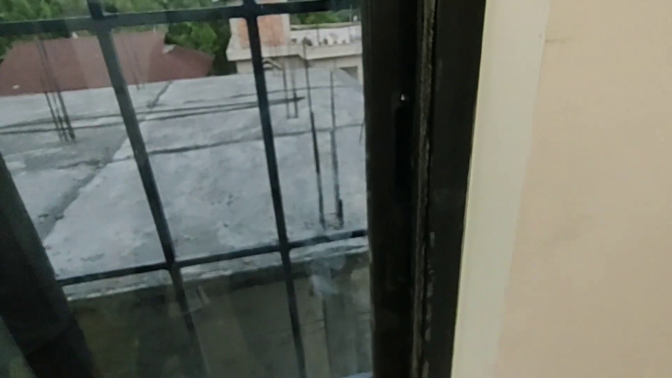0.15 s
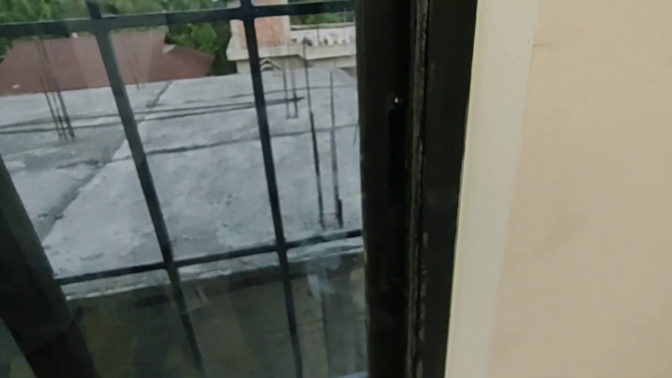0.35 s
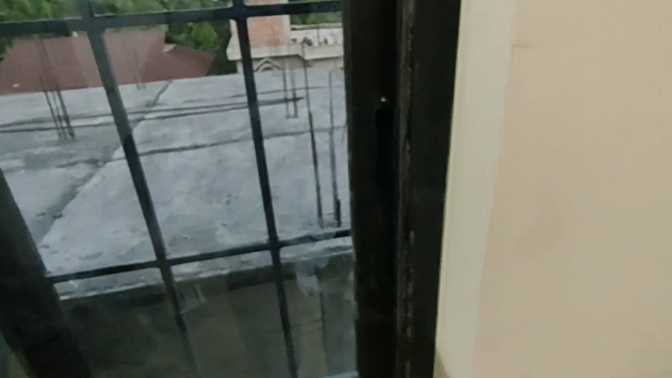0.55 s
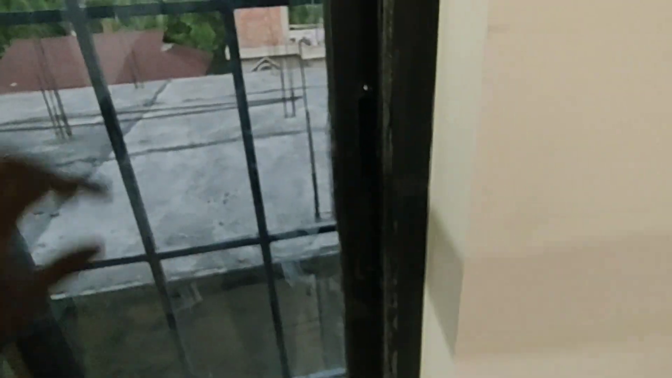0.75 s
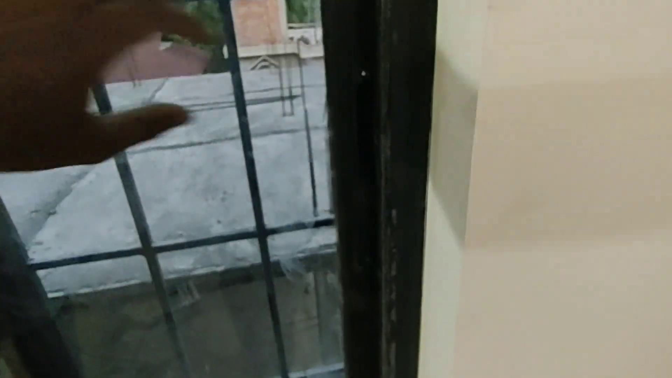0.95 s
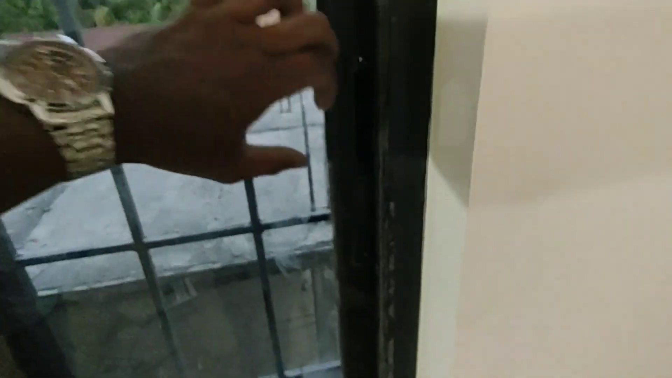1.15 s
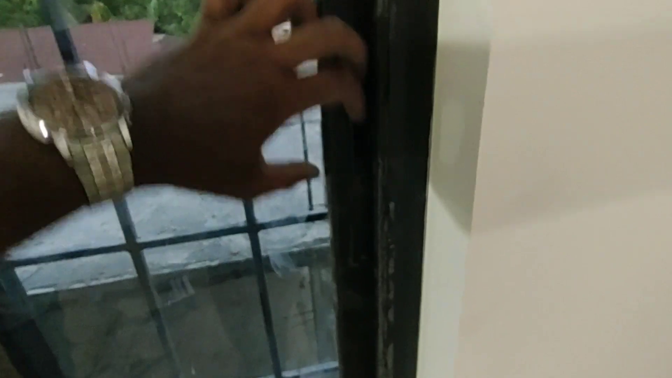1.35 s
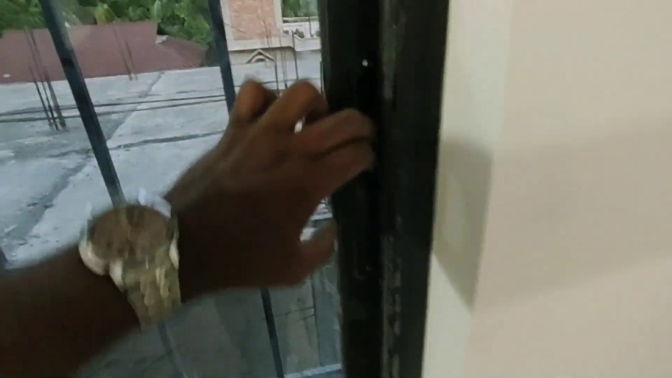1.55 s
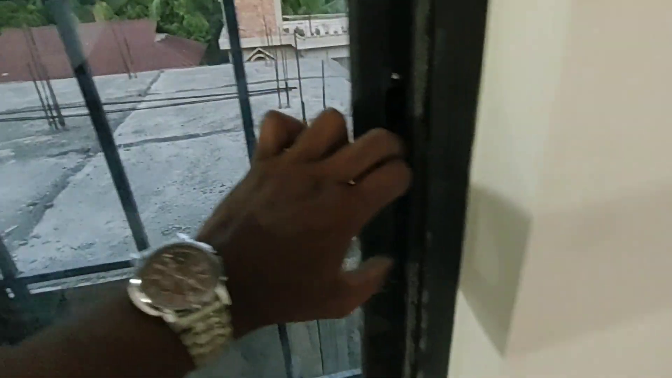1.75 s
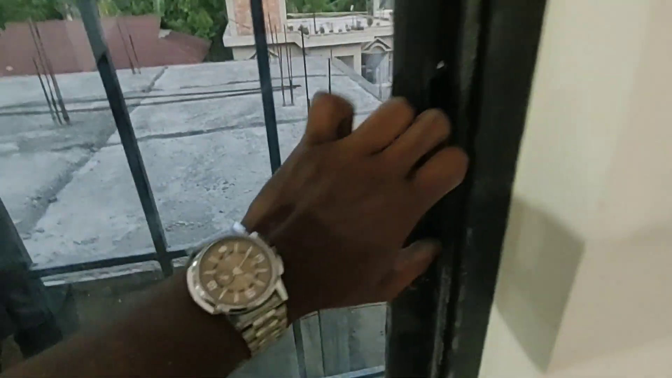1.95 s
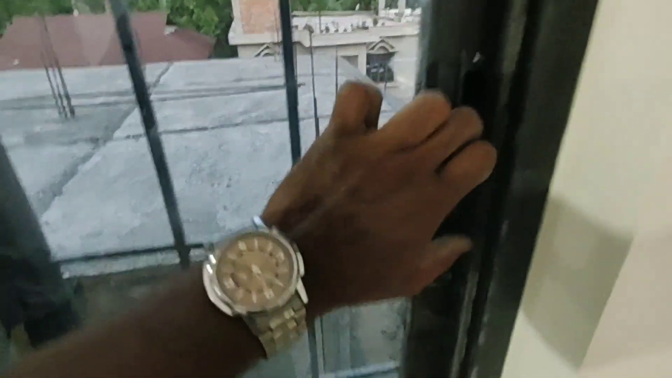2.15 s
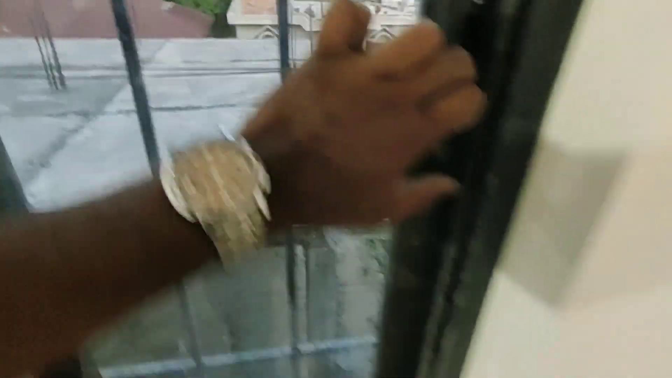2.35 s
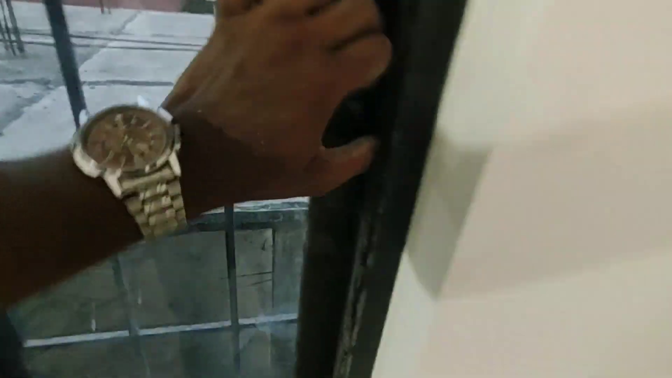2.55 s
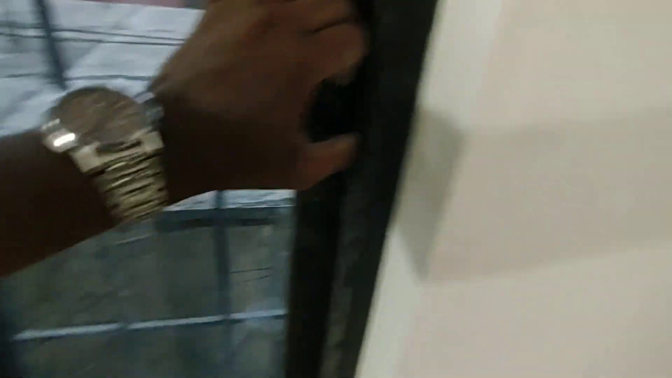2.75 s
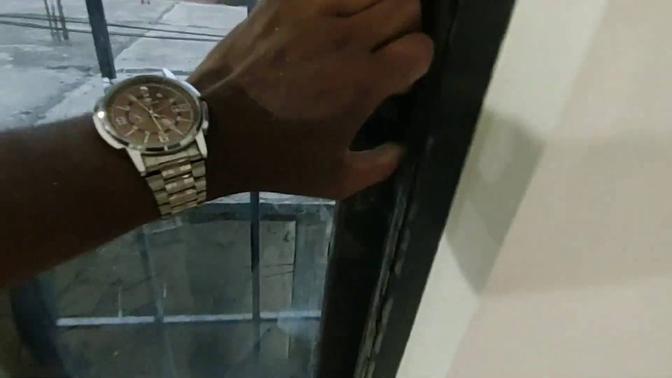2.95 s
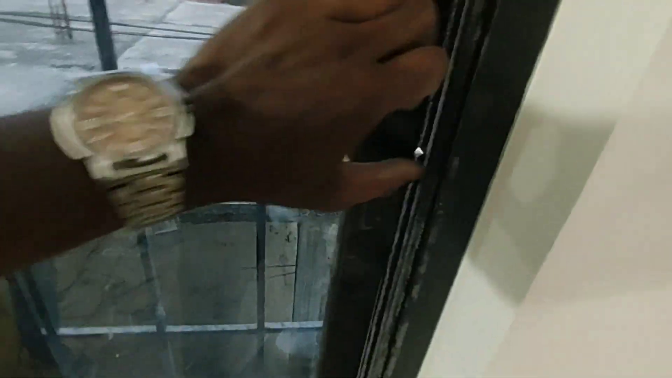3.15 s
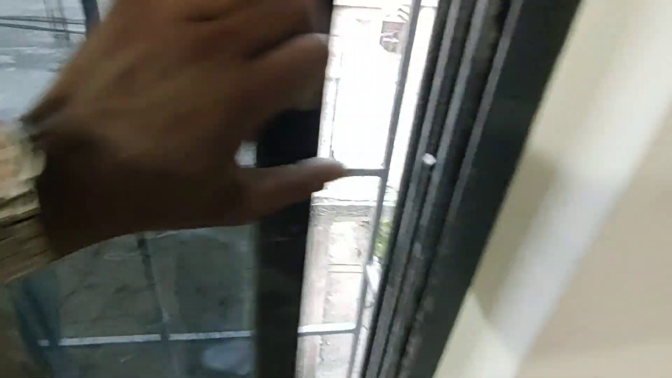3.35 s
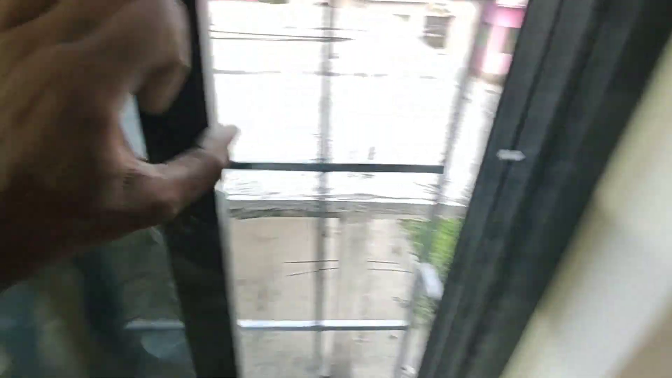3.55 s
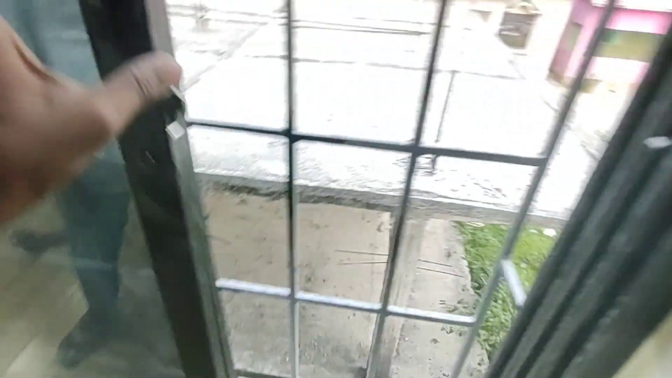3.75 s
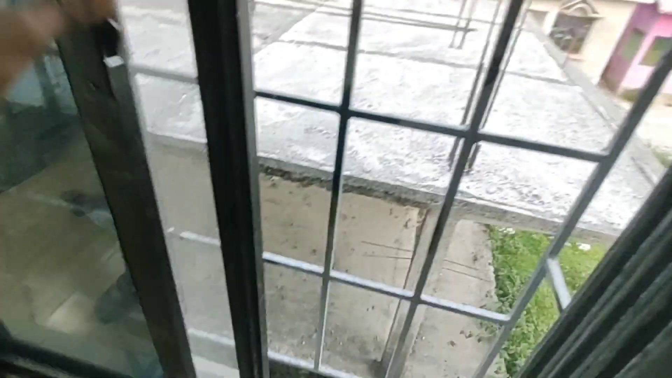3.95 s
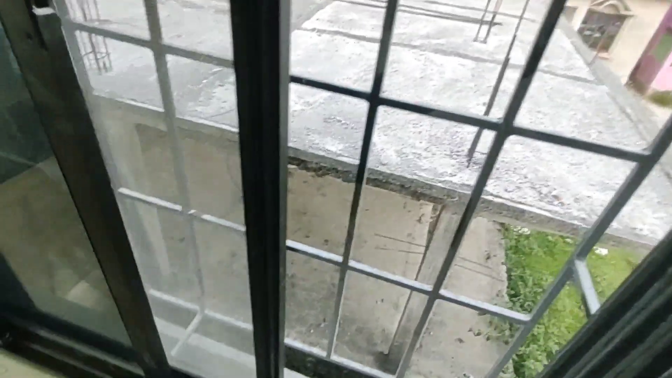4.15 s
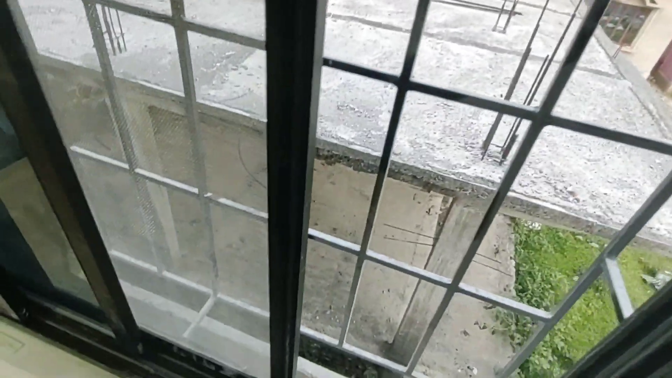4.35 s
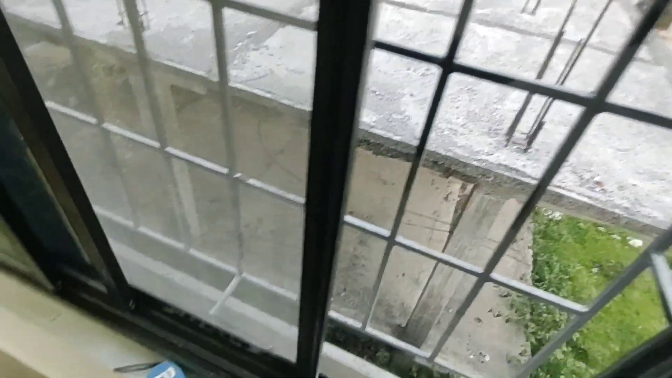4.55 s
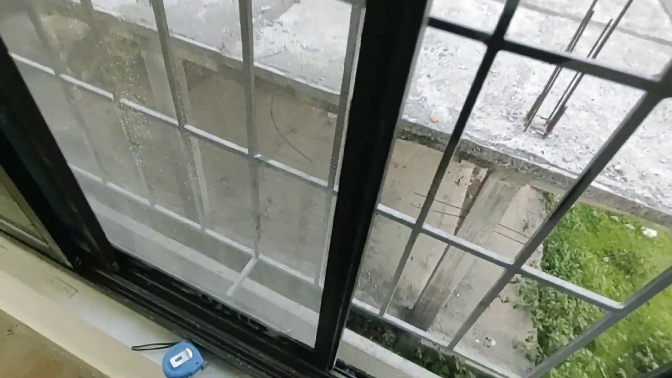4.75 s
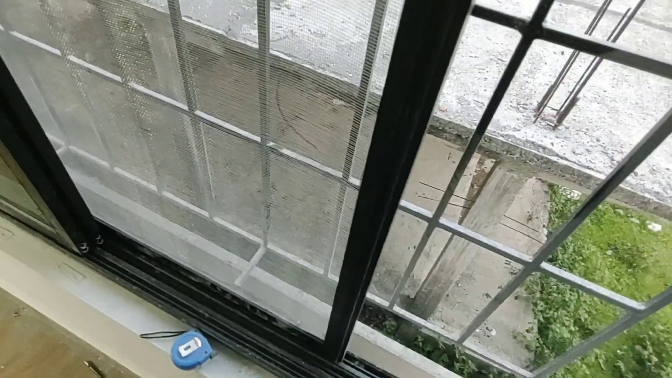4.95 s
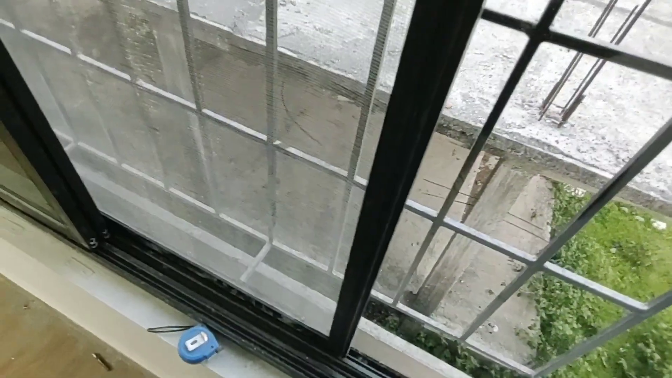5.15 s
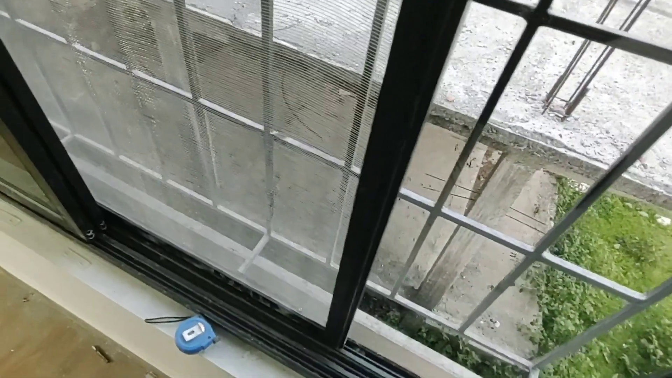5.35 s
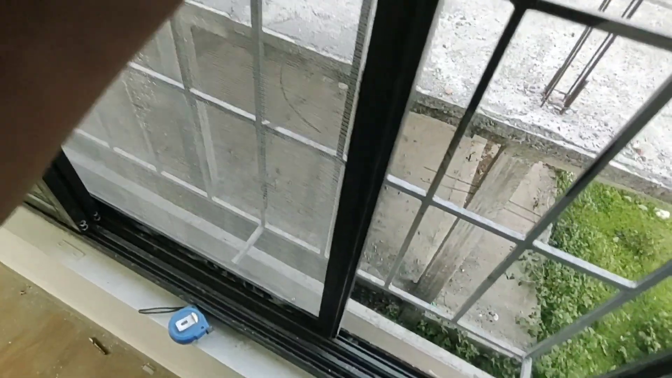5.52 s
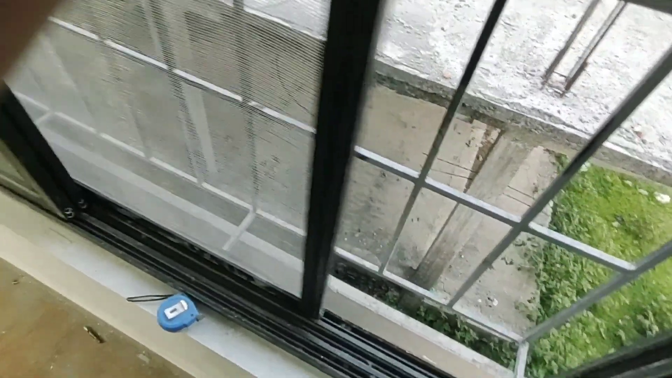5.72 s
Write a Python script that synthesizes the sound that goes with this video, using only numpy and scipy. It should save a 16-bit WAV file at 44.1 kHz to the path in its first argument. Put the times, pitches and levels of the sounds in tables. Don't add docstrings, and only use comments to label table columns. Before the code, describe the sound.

Sliding aluminium window worked by hand, heard up close with short hard-wall reverberation. Light fumbling and a dry catch click lead to a thump, short scrape and crisp clack. Gritty sliding grows to a cluster of metallic knocks; another sash glides with a low rumble and hissing seal, then slams with a hollow glassy thud. A tiny high roller squeak comes near the end.

```python
import sys
import numpy as np
from scipy import signal
from scipy.fft import rfft, irfft
from scipy.io import wavfile
from scipy.ndimage import uniform_filter1d

SR = 44100
rng = np.random.default_rng(int(sys.argv[2]) if len(sys.argv) > 2 else 0)


def makeup_ratio(level_db):
    decades = np.asarray(level_db, float) / 20
    return 10 ** decades


def persist_wave(psi):
    counts = np.round(np.clip(psi, -1, 1) * 32767).astype(np.int16)
    wavfile.write(sys.argv[1], SR, np.atleast_2d(counts).T)


N = 259616
TIME = np.arange(N) / SR

# frequency in Hz, level in dB, decay time t60 in s.
PANE_MODES = [(75, -6, 0.3), (101, -1, 0.3), (122, 1, 0.4), (133, -1, 0.3), (160, 1, 0.25), (188, -3, .2),
              (215, -1, 0.3), (236, -1, 0.4)]
# start in s, peak in dB, hollow part in dB, brightness in dB,
# rattle left in the frame in dB.
CLICKS = [(1.5857, -52.5, -6, -6.5, -1), (1.672, -30, 4, -6, -3.5), (2.079, -61, -4, -4.5, -8),
          (2.164, -54.5, 12.5, 1.5, 10), (2.205, -57, 12, -2, 0), (2.331, -42, 7, -11, -10),
          (2.339, -20.5, 7, -14.5, -1), (2.8104, -8.5, -4.5, -2.5, -1.5), (3.703, -23.5, -18, 7.5, -2),
          (3.9076, -23, 3, -1.5, 10), (3.9217, -10.5, -11, -6, -19), (3.93, -14, 3, 1, -18),
          (3.9418, -23, 1, 6.5, -21), (3.997, -32, -3, -3, -14), (4.012, -25, 4, 3, -14),
          (4.022, -32, 3, 1, -14), (4.7946, -22, 2, -6.5, -14), (4.9431, -26.5, -38, -17, -15),
          (5.0634, -10, 1, -8, -7), (5.074, -29.5, -16, 6.5, -12), (5.0826, -26.5, -4, 1.5, -5),
          (5.104, -19, 0, 9, -17), (5.1419, -20.5, -13, -4, 0), (5.1877, -25, -2, 5, -6),
          (5.2037, -30.5, -8, 6, -10)]
# start in s, peak in dB, track share in dB, chatter in ms,
# deep part of the track in dB.
THUDS = [(0.829, -45, -19, 7.7, 4), (1.272, -28.5, -23, 8.8, -1), (1.329, -40, -22, 6, 6),
         (1.41, -50, -20, 3.6, 5), (1.579, -32.5, -22, 4.5, 2), (1.623, -35, -25, 9.5, -8),
         (1.668, -30.5, -2, 2.4, -1), (2.329, -21, -30, 4.6, -2), (2.337, -17, -9.5, 2.3, -4),
         (2.807, -24.5, 2.5, 5, -5), (3.906, -11.5, -7, 8, 2), (3.921, -10.5, -4, 5.1, 5),
         (3.942, -18, -9.5, 6.4, -3), (3.992, -13, -9, 4.7, 4), (4.04, -12.5, -10, 2.6, -1.5),
         (5.061, -2.5, -5, 8.3, -4), (5.086, -20, -6, 2.6, -9), (5.104, -18.5, -3.5, 12.5, 4),
         (5.139, -4, -18.5, 10, -1), (5.343, -12, -32.5, 6.8, 13), (5.372, -25.5, -19, 3.4, 8.5),
         (5.446, -23.5, -22, 5.4, 4)]


def unit(x):
    return x / np.sqrt(np.mean(x ** 2))


def curve(table, order):
    rows = np.array(table, float)
    return np.interp(TIME, rows[:, 0], rows[:, order])


def span(from_s, to_s):
    return uniform_filter1d(1. * (TIME > from_s) * (TIME < to_s), size=800)


def arch(s, long_s, skew):
    return np.sin(np.pi * np.clip((TIME - s) / long_s, 0, 1) ** skew)


def walk(rate):
    hold = int(SR / rate)
    steps = np.repeat(rng.standard_normal(N // hold + 1), hold)
    return unit(uniform_filter1d(steps, hold)[:N])


def after(hits, under_db, loss_db_s):
    s, db = np.transpose(hits)
    power = np.zeros(N)
    power[(s * SR).astype(int)] = makeup_ratio(db + under_db) ** 2
    return np.sqrt(signal.lfilter([1], [1, -makeup_ratio(-2 * loss_db_s / SR)], power))


def band(x, low_hz, high_hz):
    return signal.sosfilt(signal.butter(2, [low_hz, high_hz], "band", fs=SR, output="sos"), x)


def response(spectrum):
    hz, db = np.transpose(spectrum)
    grid = np.arange(4097) * SR / 8192 + 1
    log_gain = np.interp(np.log(grid), np.log(hz), db) * np.log(10) / 20
    cep = irfft(log_gain)
    cep[1:4096] *= 2
    cep[4097:] = 0
    h = irfft(np.exp(rfft(cep)))[:4096]
    return h / np.sqrt(np.sum(h ** 2))


def ringing(spectrum, modes, most_t60, modes_db):
    t = TIME[:SR // 2]
    ring = sum(makeup_ratio(db) * np.sin(2 * np.pi * hz * t) * makeup_ratio(-60 * t / min(t60, most_t60))
               for hz, db, t60 in modes)
    h = makeup_ratio(modes_db) * ring / np.sqrt(np.sum(ring ** 2))
    h[:4096] += response(spectrum)
    return h / np.sqrt(np.sum(h ** 2))


def through(x, h):
    return signal.oaconvolve(x, h)[:N]


def place(x, pan_db):
    return x * makeup_ratio(np.array([pan_db, -pan_db]).reshape(2, -1) / 2)


def spread(noise, same_below_hz):
    mid, side = noise
    side = signal.sosfilt(signal.butter(1, same_below_hz, "high", fs=SR, output="sos"), side)
    return np.array([mid + side, mid - side])


def sing(s, long_s, hz, db, wobble):
    tone = np.sin(2 * np.pi * np.cumsum(hz * (1 + wobble * walk(220))) / SR)
    return place(np.sqrt(2) * tone * span(s, s + long_s) * makeup_ratio(db), 0.)


def add(force, s, burst):
    i = int((s - .0015) * SR)
    force[..., i:i + burst.shape[-1]] += burst


def grit(per_s, spread_db, flicker_db):
    hits = rng.random(N) < per_s / SR
    grains = hits * makeup_ratio(spread_db * rng.exponential(size=N)) * rng.standard_normal(N)
    return unit(grains * makeup_ratio(flicker_db * walk(25)))


def rubbing(grain, wide):
    return grit(*grain) + wide * grit(*grain) * np.array([[1], [-1]])


def frame_rattle():
    # frequency in Hz, density in dB per Hz.
    rattle_colour = [(500, -61), (1000, -25), (1300, -3.5), (1750, 0), (2200, 1.5), (2750, 2), (3400, -8),
                     (4300, -12.5), (7500, -37)]
    level = after([(r[0], r[1] + r[4]) for r in CLICKS], under_db=-12, loss_db_s=80)
    rattle = rubbing((9000, 1.5, .8), 1.0) * level
    return np.array([through(side, response(rattle_colour)) for side in rattle])


def sash():
    # frequency in Hz, density in dB per Hz.
    pane_body = [(18, -53), (30, -50), (49, -28), (76, -20), (112, 1), (190, -2), (284, -5.5), (330, -3.5),
                 (430, -21.5), (730, -120)]
    track_body = [(150, -32), (260, -2), (300, -11), (414, 0.5), (470, -1.5), (700, -3), (1300, -9.5),
                  (1800, -37), (2860, -120)]
    frame_body = [(590, -23), (1000, -4.5), (1290, 1.5), (1570, 0.5), (1760, -0.5), (2730, -0.5),
                  (3480, -3.5), (4800, -7), (6240, -6.5), (10600, -120)]
    seal_body = [(2650, 1.5), (4500, -8.5), (5330, -53), (5990, 1.5), (8290, 1.5), (8970, 1), (11000, -1),
                 (14900, -6.5), (16300, -2.5)]
    # time in s, rubbing in dB, weight on the rollers in dB.
    strokes = [
        [(2.14, -54, -19), (2.17, -65, 7), (2.26, -69.5, 3), (2.32, -48.5, -4)],
        [(2.34, -39, -47), (2.49, -30.5, -25), (2.55, -24.5, -28), (2.63, -25.5, -27), (2.7, -30.5, -15.5),
         (2.8, -38, -6.5)],
        [(2.86, -49, -11), (2.95, -33, -32), (3.11, -32, -14), (3.16, -26.5, -25), (3.23, -33.5, -20),
         (3.29, -36, -18), (3.41, -32, -11.5), (3.53, -35, -3), (3.55, -30, -4), (3.62, -32, -4.5),
         (3.68, -31.5, 1), (3.7, -33.5, -4)],
        [(3.72, -47, 6), (3.785, -36, -6), (3.8, -27, -9), (3.915, -32, 1)],
        [(3.93, -35, 9), (4.11, -33, -13), (4.25, -38.5, 0.5), (4.52, -37, -3.5), (4.55, -35, -2.5),
         (4.66, -34.5, -1.5), (4.78, -35.5, -1.5), (4.83, -35, -2.5), (5.064, -38, -0.5)],
        [(5.45, -60, -39), (5.64, -57.5, 7), (5.71, -54, 1.5), (5.83, -64, 4), (5.887, -51.5, -2)],
    ]
    # offset in dB, share of the roller weight as a ratio.
    drives = [
        (-3, 0.9),
        (2, 1.2),
        (-1, 0.03),
        (0, 0.18),
    ]
    bodies = (ringing(pane_body, PANE_MODES, most_t60=0.28, modes_db=-3.0), response(track_body),
              response(frame_body), response(seal_body))
    grains = (2490, 0.82, 1.14), (3443, 1.95, 0.76), (8090, 0.59, 0.93), (14210, 2.4, 1.7)
    apart = 0.2, .55, .8, .9
    pane_shudder = after([r[:2] for r in THUDS], under_db=-20, loss_db_s=40.5)
    track_shudder = after([(r[0], r[1] + r[2]) for r in THUDS], under_db=-14.5, loss_db_s=59.7)
    seal_rattle = after([(r[0], r[1] + r[3]) for r in CLICKS], under_db=-39, loss_db_s=280)
    shakes = pane_shudder, track_shudder, 0, seal_rattle

    out = frame_rattle()
    for body, grain, wide, shake, (offset_db, share) in zip(bodies, grains, apart, shakes, drives):
        slide = 0
        for rows in strokes:
            level_db = curve(rows, order=1) + share * curve(rows, order=2) + offset_db
            slide = slide + makeup_ratio(level_db) * span(rows[0][0], rows[-1][0])
        force = rubbing(grain, wide) * np.hypot(slide, shake)
        out = out + np.array([through(side, body) for side in force])

    thin = signal.sosfilt(signal.butter(1, [3300., 5800.], "band", fs=SR, output="sos"), out)
    edge = signal.sosfilt(signal.butter(1, [10500., 17000.], "band", fs=SR, output="sos"), out)
    out = out - .8 * edge * span(5.3, 6)
    return out - 0.41 * thin * span(4.2, 5.06)


def rollers():
    turn_s, turn_db, press_db = .127, 6, -44.5
    growl = makeup_ratio(-31.5 - 34 * np.abs(3.7 - TIME)) * span(3.42, 3.7)
    press = makeup_ratio(press_db + turn_db * np.cos(2 * np.pi * (TIME - 4.55) / turn_s)) * span(4.2, 5.06)
    thin_hiss = makeup_ratio(-68) * span(5.36, 6) * unit(band(rng.standard_normal((2, N)), 9900.0, 10000.0))
    ports = []
    for _ in range(2):
        scrape = unit(band(grit(2500, 2.0, 1.3), 690.0, 1760.0))
        hiss = unit(band(grit(12000, 1.5, 1.3), 7100.0, 10000.0))
        ports.append(growl * scrape + press * hiss)
    return thin_hiss + np.array(ports)


def roller_squeak():
    start_s, long_s = 5.6, .21
    speed = arch(start_s, long_s, skew=1.24)
    return sing(start_s, long_s, 11450 + 2030 * speed, -64.5 + 5 * speed, wobble=.001)


def pane_hum():
    start_s, long_s = 2.82, .37
    return sing(start_s, long_s, 238, -51 + 9 * arch(start_s, long_s, skew=0.41), wobble=0.003)


def contact(shake, ms):
    t, tau = TIME[:len(shake)], ms / 1000
    chatter = 0.61 * shake * np.minimum(t / 0.0022, 1) * np.exp(-t / tau)
    burst = chatter + 1.2 * (np.abs(t - .0005) < .5 / SR)
    z = rfft(burst)
    even = irfft(z / np.abs(z) ** .75) * (t < 6 * tau)
    return even * np.sqrt(np.sum(burst ** 2) / np.sum(even ** 2))


def knocks():
    # frequency in Hz, level in dB, decay time t60 in s.
    track_modes = [(280, -3, .2), (322, 0, 0.35), (405, -2, .25), (441, -4, 0.3), (512, -2, 0.2),
                   (580, -3, .2), (690, -4, 0.25), (745, -5, 0.3), (910, -9, 0.3)]
    frame_modes = [(1184, -4, .04), (1410, -2, .03), (1560, 0, .03), (1745, 0, .04), (2006, 0, .04),
                   (2140, 0, .04), (2390, 0, .04), (2720, 0, .04), (3160, -4, .03), (3415, -4, .03),
                   (3690, -2, .04), (4102, -6, .03), (4549, -6, .03)]
    # frequency in Hz, density in dB per Hz.
    pane_struck = [(24, -56), (40, -27), (76, -13), (125, -0.5), (165, -5.5), (222, 2.5), (279, -10.5),
                   (330, -9.5), (430, -25), (730, -120)]
    track_struck = [(150, -33), (260, -7), (330, -0.5), (440, -1.5), (600, -3), (849, -9.5), (1100, -19.5),
                    (1430, -42), (2420, -120)]
    frame_struck = [(470, -42.5), (800, -10), (1210, -6.5), (1400, -8.5), (1780, 2.5), (1920, -2),
                    (2300, -5), (2940, -1), (5200, -24), (6760, -10), (11400, -120)]
    click_ms = 3.4
    pane, track, deep, hollow, frame, thin, edge = np.zeros((7, N))

    thud_shakes = rng.standard_normal((len(THUDS), 2, 4096))
    for (s, peak_db, track_db, ms, deep_db), shake in zip(THUDS, thud_shakes):
        add(pane, s, makeup_ratio(peak_db - 2.0) * contact(shake[0], ms))
        blow = makeup_ratio(peak_db + track_db + 10.5) * contact(shake[1], ms)
        add(track, s, blow)
        add(deep, s, makeup_ratio(deep_db) * blow)

    click_shakes = rng.standard_normal((len(CLICKS), 2, 4096))
    for (s, peak_db, hollow_db, bright_db, _), shake in zip(CLICKS, click_shakes):
        touch = makeup_ratio(peak_db + 15.0) * contact(shake[0], click_ms)
        add(frame, s, touch)
        add(hollow, s, makeup_ratio(hollow_db + 2.5) * touch)
        add(thin, s, makeup_ratio(bright_db + 8.0) * touch)
        add(edge, s, makeup_ratio(peak_db + bright_db + 17.0) * contact(shake[1], click_ms))

    rail = band(deep, 192, 454) + makeup_ratio(2.0) * band(track, 406, 2000)
    metal = band(hollow, 700, 1700) + band(frame, 1700, 3200) + band(thin, 3200, 6000)
    sound = through(pane, ringing(pane_struck, PANE_MODES, most_t60=1.7, modes_db=-8.0))
    sound = sound + through(rail, ringing(track_struck, track_modes, most_t60=0.25, modes_db=-9.5))
    sound = sound + through(metal, ringing(frame_struck, frame_modes, most_t60=0.054, modes_db=-10.0))
    return place(sound + band(edge, 2270.0, 10500.0), 0.)


def pings():
    # start in s, peak in dB, frequency in Hz, t60 in s.
    small_parts = [(1.275, -43.5, 440, 0.12), (1.318, -39, 215, .12), (1.37, -44, 199, .12),
                   (1.408, -41, 237, .1), (1.44, -53, 208, .1), (1.671, -24, 1910, 0.031),
                   (1.672, -30, 2220, 0.035), (1.672, -27, 1140, 0.041), (1.675, -42, 4080, 0.1),
                   (2.0795, -49, 2200, 0.019), (2.2035, -42, 1260, 0.023), (2.321, -38, 150, .05),
                   (2.808, -17.5, 522, 0.048), (2.338, -25.5, 5280, .015), (2.8095, -11, 1520, 0.034),
                   (2.81, -18, 8800, 0.017), (2.8115, -15, 4630, .02), (2.812, -17, 6100, 0.027),
                   (2.821, -21, 6500, .05), (2.8135, -5, 1760, 0.023), (2.817, -17, 2390, 0.028),
                   (3.7008, -15, 11200, .008), (3.7022, -10, 3680, .018), (3.7025, -22, 5830, 0.014),
                   (3.707, -7, 3240, .02), (3.9215, -13, 2020, 0.029), (3.943, -12, 7700, .012),
                   (3.944, -11, 5700, .025), (3.95, -22, 3640, .08), (4.795, -17.5, 2800, 0.029),
                   (5.064, -15.5, 599, .12), (5.063, -12, 737, .08), (5.098, -14, 317, .1),
                   (5.125, -14, 235, 0.13), (5.17, -18, 330, 0.22), (5.25, -17, 205.6, 0.099),
                   (5.335, -20, 179, 0.11), (5.372, -27, 165, 0.079)]
    out, t = np.zeros(N + SR), TIME[:SR // 4]
    for s, peak_db, hz, t60 in small_parts:
        add(out, s, makeup_ratio(peak_db - 60 * t / t60) * np.minimum(t * hz, 1) * np.sin(2 * np.pi * hz * t))
    return place(out[:N], 0.)


def jolts():
    # start in s, peak in dB, frequency in Hz.
    pushes = [(0.828, -52, 109), (1.272, -43, 214), (1.345, -43.5, 118), (1.609, -42, 123),
              (1.672, -36, 124), (1.761, -41, 113), (2.33, -26, 99.7), (2.46, -31.5, 88), (2.62, -36, 70),
              (2.82, -40, 59.7), (2.92, -41, 75), (4.3, -25.5, 108), (5.061, -15.5, 152),
              (5.62, -30.5, 110.4), (5.701, -38, 112.5)]
    out, t = np.zeros(N + SR), TIME[:SR // 2]
    for s, peak_db, hz in pushes:
        decay = makeup_ratio(peak_db - 60 * t / 0.29)
        add(out, s, decay * np.sin(2 * np.pi * hz * t) * np.minimum(t / 0.0052, 1))
    return place(out[:N], 0.)


def creak():
    # start in s, peak in dB, frequency in Hz.
    slips = [(1.957, -46.5, 1170), (2.0788, -44.5, 1220), (2.166, -40, 1170), (2.1842, -38.5, 1340),
             (2.2035, -45, 1250), (2.2773, -44, 1280), (2.306, -39.5, 1240)]
    from_s, to_s, centre_hz = 1.28, 2.36, 1230
    level = span(from_s, to_s) * makeup_ratio(-70 + 13 * (TIME - from_s) + 2.5 * walk(30.))
    grains = grit(900, 1.0, 1.0) + 1j * grit(900, 1.0, 1.0)
    rub = signal.sosfilt(signal.butter(2, 240., fs=SR, output="sos"), grains)
    ring = unit(np.real(rub * np.exp(2j * np.pi * centre_hz * TIME))) * level
    t = TIME[:2048]
    for s, peak_db, hz in slips:
        decay = makeup_ratio(peak_db + 11.0 - 60 * t / 0.021)
        add(ring, s, decay * np.minimum(t / 0.0016, 1) * np.sin(2 * np.pi * hz * t))
    return place(ring, 0.)


def spring():
    start_s, hold_s = 1.675, 0.092
    buzz = unit(band(band(grit(3100, 1.7, 1.5), 1700.0, 2500.0), 1450.0, 2660.0))
    late = np.maximum(TIME - start_s - hold_s, 0)
    return place(buzz * (TIME > start_s) * makeup_ratio(-42 - 12 * (TIME - start_s) - 123 * late), 0.)


def rustle():
    # frequency in Hz, density in dB per Hz.
    rustle_colour = [(710, -22), (1200, -26), (1560, -16.5), (2540, -4.5), (3340, -7.5), (6110, -6.5),
                     (8300, -12.5), (10000, -21.5), (12500, -23), (15000, -45)]
    # time in s, level in dB.
    gusts = [(0.7, -76), (0.9, -64.5), (1.05, -71), (1.22, -87), (1.33, -66), (1.5, -93), (1.6, -68),
             (2.0, -74)]
    hiss = through(grit(20000, 1.0, 0.55), response(rustle_colour))
    db = -53.5 - 2.5 * TIME - 117 * np.maximum(TIME - 0.62, 0)
    db = db - 4.5 * (1 - span(-1, 0.47)) + 0.41 * walk(2.7)
    return place(hiss * makeup_ratio(db), -21.5) + place(hiss * makeup_ratio(curve(gusts, order=1)), 0.)


def whistles():
    # start in s, length in s, frequency in Hz, level in dB.
    far_tones = [(1.11, .17, 2515, -68.5), (1.315, .085, 2015, -69.5), (1.1, .05, 4400, -70),
                 (5.53, .1, 3750, -70)]
    return sum(sing(*row, wobble=.012) for row in far_tones)


def room(dry):
    # frequency in Hz, reverberation time t60 in s.
    room_decay = [(100, 0.24), (400, 1), (1500, 0.16), (4000, 0.48), (9000, 0.41), (15000, 0.21)]
    hz, t60 = np.transpose(room_decay)
    f, t, z = signal.stft(spread(rng.standard_normal((2, SR)), 850.0), SR, nperseg=256)
    decay = np.interp(np.log(f + 1), np.log(hz), t60)[:, None]
    tail = signal.istft(z * makeup_ratio(-60 * t / decay), SR, nperseg=256)[1]
    tail = tail * np.clip(TIME[:tail.shape[1]] / 0.00044 - .2, 0, 1)
    tail = tail / np.sqrt(np.sum(tail ** 2) / 2)
    return np.array([through(dry.mean(axis=0), h) for h in tail])


def hush():
    # frequency in Hz, density in dB per Hz.
    hush_colour = [(15, -55), (25, -5), (95, -6.5), (128, -4), (243, -6.5), (354, -14), (1200, -23.5),
                   (1760, -22), (2500, -13.5), (3350, -21.5), (4500, -24), (8300, -30.5), (9300, -28),
                   (10000, -26), (10900, -35), (15000, -29)]
    noise = spread(rng.standard_normal((2, N)), 520.0)
    air = unit(np.array([through(side, response(hush_colour)) for side in noise]))
    return air * makeup_ratio(-60.5 + 12 * np.exp(-TIME / 0.47) + 0.9 * walk(4.96))


def scene():
    rub = sash() + roller_squeak() + pane_hum() + rollers()
    hits, small = knocks(), pings()
    catch = creak() + spring()
    far = rustle() + whistles()
    dry = rub + hits + small
    lag = int(.45 * SR / 1000)
    low = signal.sosfiltfilt(signal.butter(1, 370, fs=SR, output="sos"), dry[1])
    direct = np.array([dry[0], low + np.roll(dry[1] - low, lag)])
    direct = direct + makeup_ratio(-5.5) * catch
    tail = room(makeup_ratio(-2) * hits + makeup_ratio(-7.5) * small + makeup_ratio(-8) * rub + makeup_ratio(-1.5) * catch + makeup_ratio(-2.5) * far)
    return makeup_ratio(0.5) * (direct + tail) + jolts() + far + hush()


def roll_off(x):
    return signal.sosfilt(signal.butter(12, 16480, fs=SR, output="sos"), x)


def record(dry):
    # frequency in Hz, left minus right in dB.
    port_balance = [(60, 2.5), (110, 2.0), (200, 2.5), (380, 1.5), (700, 1.5), (1290, 0.5), (2380, -2.5),
                    (4400, -2.5), (8120, -5.0), (15000, -1.5)]
    tilt = [response([(max(hz, 1), side * db / 2) for hz, db in port_balance]) for side in (1, -1)]
    heard = np.array([through(dry[0], tilt[0]) * makeup_ratio(-1.98), through(dry[1], tilt[1]) * makeup_ratio(1.26)])
    heard = np.tanh(.95 * heard) / .95
    heard = signal.sosfilt(signal.cheby1(10, .3, 15300, fs=SR, output="sos"), heard)
    heard = signal.sosfilt(signal.butter(3, 52, "high", fs=SR, output="sos"), heard)
    return roll_off(heard)


dry = scene()
out = record(dry)
persist_wave(out)
```